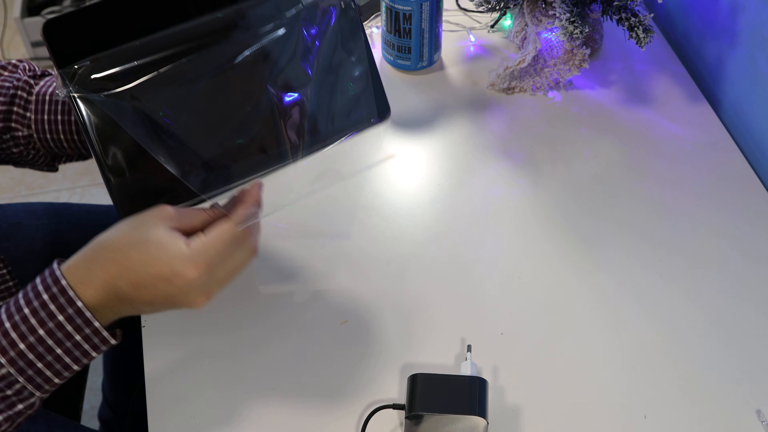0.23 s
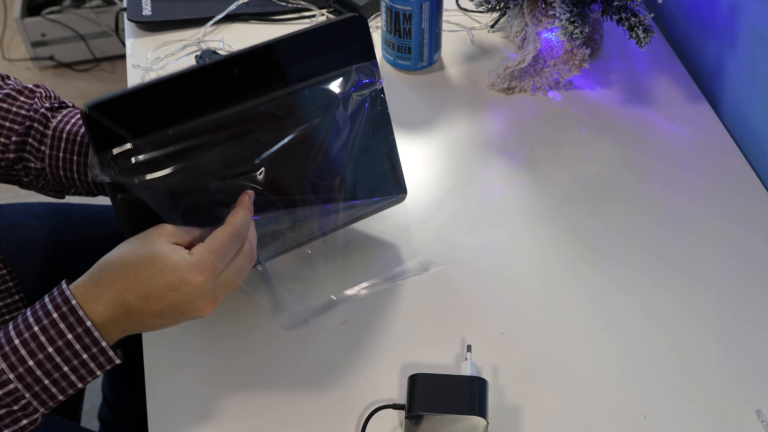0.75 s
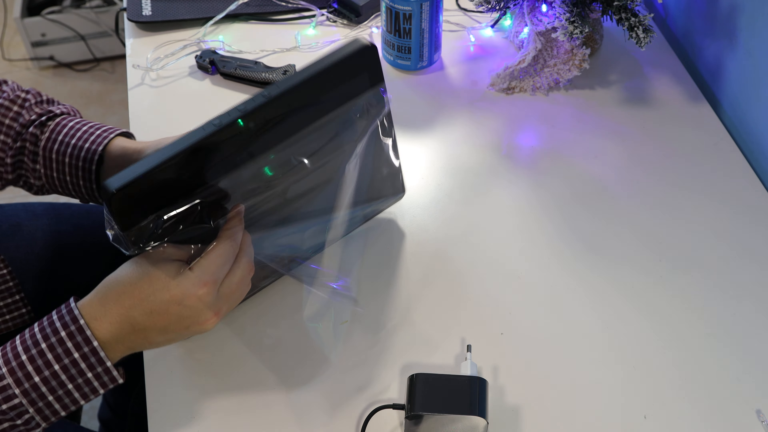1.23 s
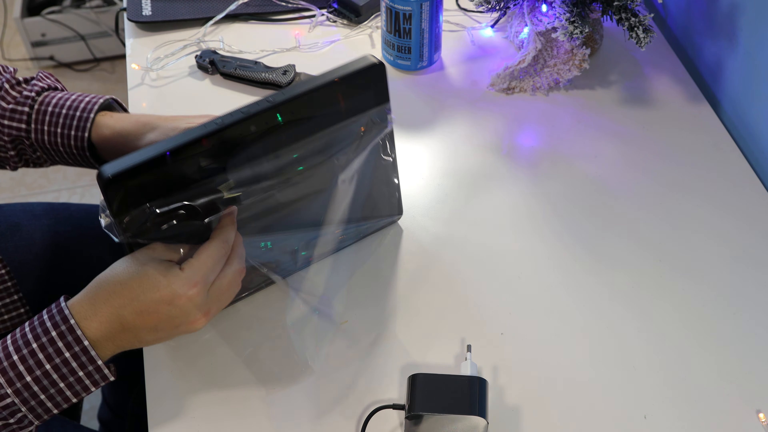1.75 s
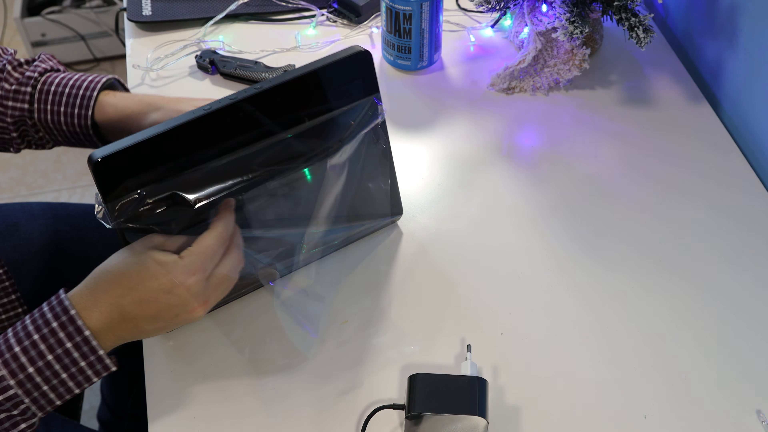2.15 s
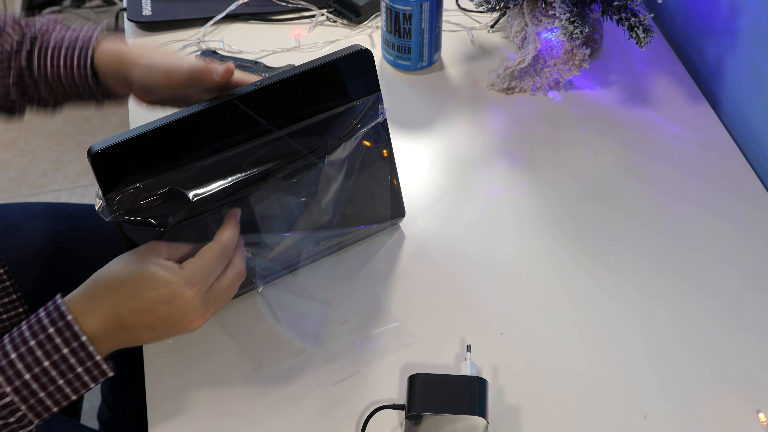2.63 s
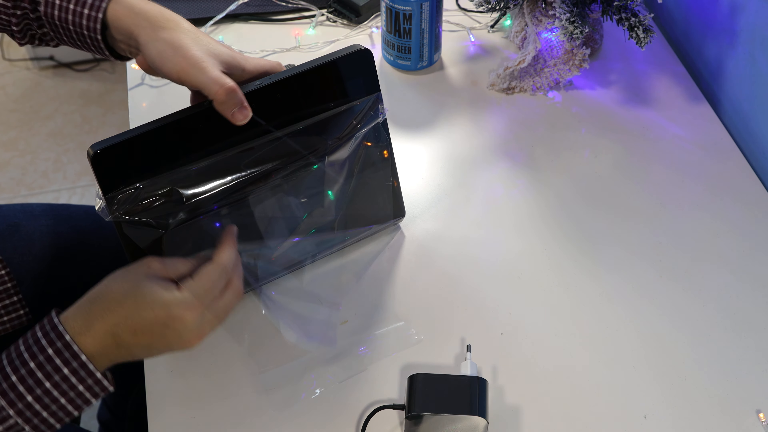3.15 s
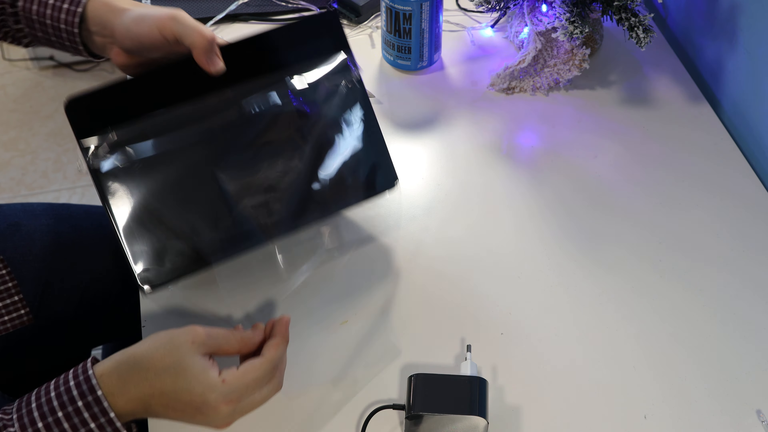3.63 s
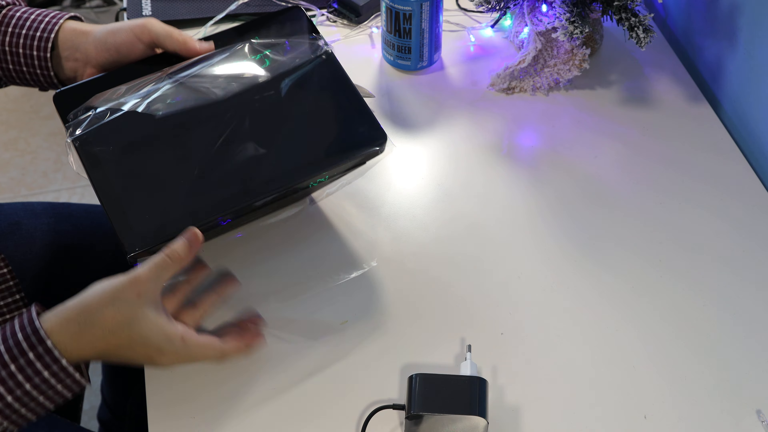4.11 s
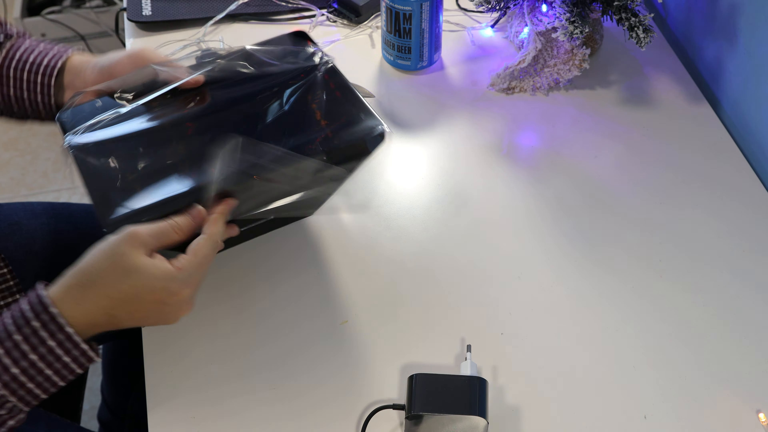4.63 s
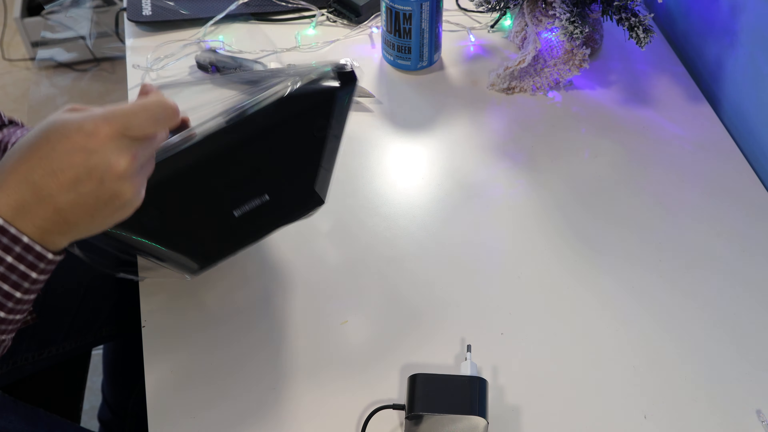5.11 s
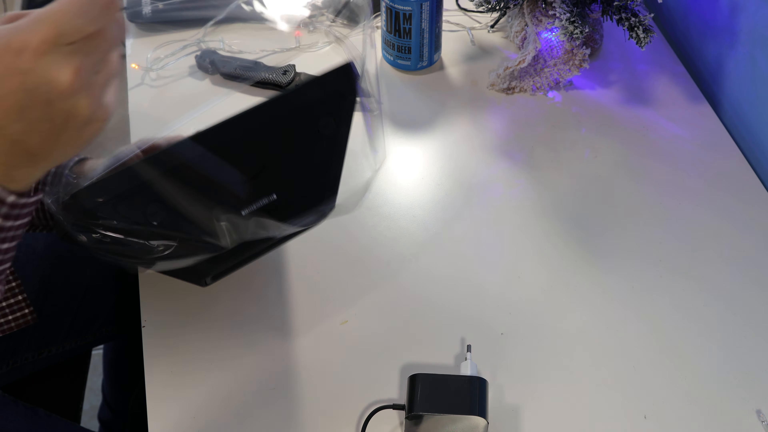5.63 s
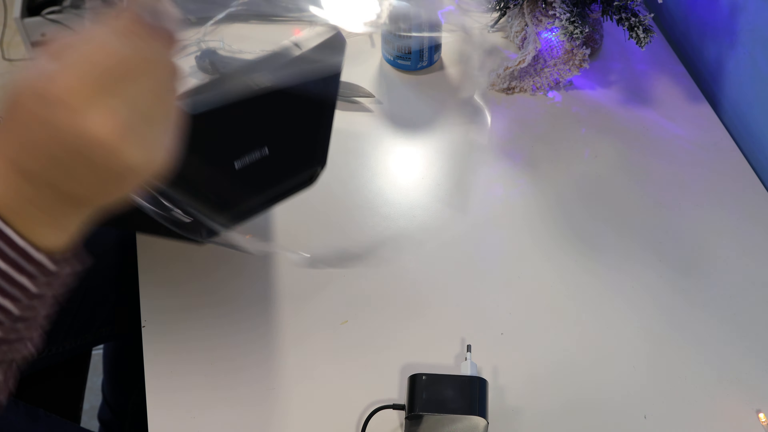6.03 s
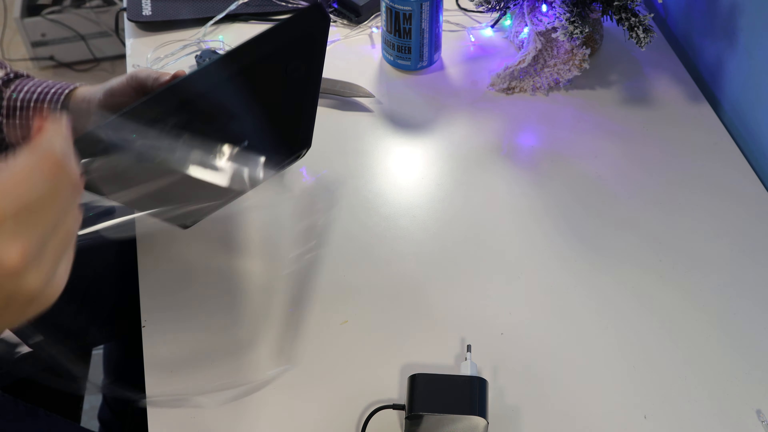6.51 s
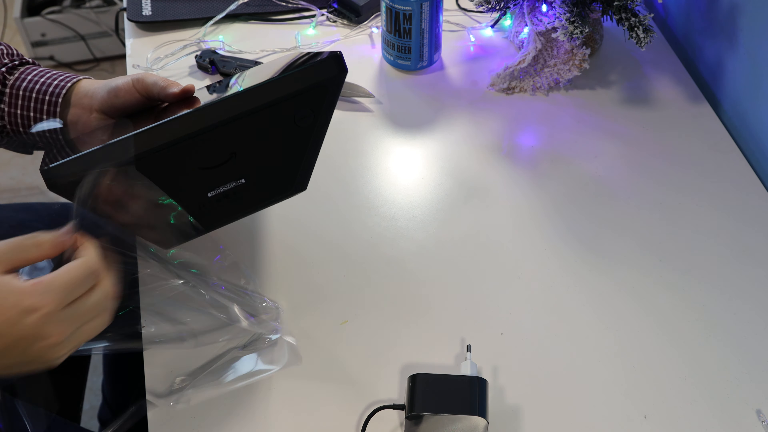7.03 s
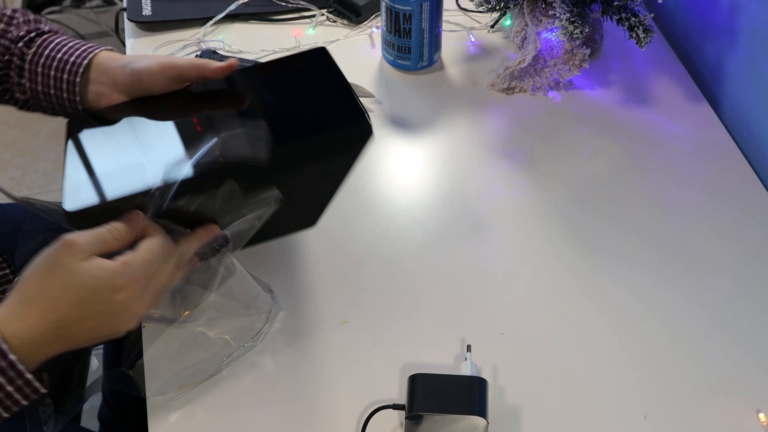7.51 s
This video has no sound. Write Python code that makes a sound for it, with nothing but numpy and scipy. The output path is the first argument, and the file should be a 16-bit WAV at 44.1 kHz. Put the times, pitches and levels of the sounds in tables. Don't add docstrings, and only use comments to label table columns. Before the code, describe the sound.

Thin plastic film rustles sharply and snaps as a flat screen is turned over a desk, its edge knocking the wood once hard and touching softly. Fingers then pick at the film with lighter, sparser crackles. The film pulls off in loud, bright snaps, briefly eases, then is crumpled in dense crinkles. Close stereo microphone, source slightly left, small hard room, faint hiss.

```python
import sys
import numpy as np
from scipy import signal
from scipy.fft import rfft, irfft
from scipy.io import wavfile
from scipy.ndimage import uniform_filter1d

SR = 44100
rng = np.random.default_rng(int(sys.argv[2]) if len(sys.argv) > 2 else 0)


def persist_wave(psi):
    counts = np.round(np.clip(psi, -1, 1) * 32767).astype(np.int16)
    wavfile.write(sys.argv[1], SR, np.atleast_2d(counts).T)


def volts(x):
    e = np.asarray(x, float) / 20
    return 10 ** e


N = 342216

# (greatest effort [s], rustle level [dB], swell [s], fade [s], tautness as treble level [dB])
TUGS = [(0.0, -23, .05, 0.094, -6.5), (0.15, -39, 0.014, 0.17, -2), (0.52, -46.5, 0.23, 0.58, -11),
        (0.89, -37.5, 0.064, 0.26, -22), (1.05, -36.5, 0.53, 0.29, -17), (1.48, -33, 0.17, 0.64, -8),
        (1.87, -42.5, 0.13, 0.33, -11), (2.029, -29, 0.2, 0.2, -6), (2.66, -39, .25, 0.24, -7),
        (2.94, -39, 0.12, 0.23, -14), (3.25, -40.5, 0.076, 0.24, -6), (3.38, -37, .1, .3, -10.5),
        (3.69, -36, 0.072, 0.64, -20), (4.12, -32.5, 0.031, 1, -7), (4.5, -33, .5, 0.9, -7.5),
        (4.88, -31, 0.035, 0.19, -40), (5.077, -22.5, 0.086, 0.27, -7.5), (5.575, -19, 0.17, 0.25, -5.5),
        (5.899, -32, 0.59, 0.24, -10), (6.55, -72, 0.18, 0.21, -24), (6.72, -32, 0.055, .3, -7.5),
        (6.969, -27.5, .12, .35, -9.5), (7.309, -23.5, 0.24, 0.17, -4), (7.644, -27.5, 0.23, .2, -7)]
SWING_DB, BEND = 30, 1.6
# (frequency [Hz], density [dB per Hz])
RUSTLE_SPECTRUM = [(88, -47.5), (150, -5), (439, -1.5), (624, -5.5), (821, 0), (1900, 0), (13700, -3),
                   (16000, -15)]
TICKS_PER_S, TICKS_PER_DB = 3500, 0.43
AFTER_DB, AFTER_S, AFTER_TAUT_DB = -25.5, 0.076, 13.5
# (frequency [Hz], density [dB per Hz])
AIR_SPECTRUM = [(18, -43), (30, -7.5), (250, 0.5), (792, -4.5), (953, -8), (2400, -4.5), (15200, -20),
                (16500, -32)]
AIR_DB = -62.5
# (time [s], peak [dB], wide-fold part [dB], sharp-edge part [dB], facet resonance [Hz])
SNAPS = [(0.142, -5.5, -29, -9.5, 1440), (0.234, -23.5, -7.5, -15, 2130),
         (0.349, -33, -17, -15.5, 2170), (0.432, -34, -12, -34, 1350), (0.45, -32.5, -2, -27, 1780),
         (0.484, -28, -6.5, -24, 2320), (0.564, -31.5, -6, -37, 2450), (0.664, -33.5, -14, -22, 2580),
         (0.782, -26, -22, -28, 1780), (0.803, -29, -8, -33, 1660), (0.881, -4.5, -18, -14.5, 1820),
         (1.002, -13.5, -19.5, -20.5, 2150), (1.036, -11.5, -15, -22.5, 3300),
         (1.104, -19, -20, -17.5, 3130), (1.396, -15, -12.5, -22, 3110), (1.487, -17.5, -4, -14, 1550),
         (1.614, -17.5, -28, -11, 2190), (1.731, -23, -23, -18.5, 3170),
         (1.864, -18.5, -19, -26, 1660), (1.969, -10.5, -18.5, -17.5, 3300),
         (2.023, -7, -15.5, -12, 2420), (2.11, -11.5, -36, -15, 3970), (2.254, -19, -37, -5.5, 2760),
         (2.388, -23, -16, -20, 3150),
         (2.584, -24, -15.5, -20, 4500), (2.631, -22, -30, -38, 3640), (2.697, -18.5, -19, -28, 2100),
              (2.886, -29, -12, -27, 1350), (2.936, -17.5, -7, -25.5, 2660), (3.232, -31, -14, -35, 4590),
              (3.317, -24.5, -25, -25, 1640), (3.354, -17, -14, -27, 1610), (3.378, -13.5, -14, -22, 1620),
              (3.562, -30.5, -16, -38, 1290), (3.677, -6.5, -17.5, -22, 1810),
              (3.75, -4.5, -17.5, -13.5, 1660), (3.87, -24.5, -11, -30, 1640),
              (3.913, -20.5, -12.5, -25, 1760), (3.923, -18.5, -21, -19, 3830),
              (4.098, -11, -15.5, -24, 2110), (4.16, -18, -14, -21, 1990), (4.21, -18.5, -37, -24.5, 1960),
              (4.293, -8.5, -20, -17.5, 2180), (4.364, -12.5, -21, -22.5, 1396),
              (4.391, -22, -29, -14, 2870), (4.493, -16.5, -10, -21, 2160), (4.54, -8, -33, -12, 2260),
              (4.598, -20, -34, -20, 2200),
         (4.65, -15, -15, -24, 2000), (4.768, -24.5, -23, -27, 2587), (4.848, -1, -19.5, -18.5, 3900),
              (4.924, -2.5, -18, -11.5, 1950), (4.972, -17, -35, -12, 1640), (4.992, -10.5, -19, -12, 3510),
              (5.001, -9, -32, -25, 3980), (5.025, -6.5, -22, -15.5, 1940), (5.056, -13, -25, -9, 2820),
              (5.068, 3, -15.5, -12, 2260), (5.198, -17.5, -18, -31, 2660), (5.304, -22.5, -48, -18, 2143),
              (5.375, -20.5, -16, -28, 2240), (5.465, -21, -14, -22, 1830), (5.516, -10, -39, -10.5, 3920),
              (5.647, -4, -29, -13.5, 1990), (5.662, -8, -22, -34, 1890), (5.682, -25, -19, -25, 2050),
              (5.695, -6.5, -23.5, -18, 3980), (5.827, -21, -5, -16, 2640),
              (5.929, -12.5, -30, -14.5, 3400), (6.049, -18.5, -24, -15, 3530),
         (6.483, -30.5, -13, -37, 2330), (6.545, -35.5, -9, -43, 1690), (6.68, -12, -21, -23, 2280),
                 (6.719, -7, -17, -22.5, 1870), (6.753, -11.5, -27, -33, 2820),
                 (6.83, -25.5, -15, -22, 1450), (6.909, -18.5, -23, -18, 1730),
                 (6.945, -9.5, -28, -11.5, 3300), (6.983, -8.5, -29, -11, 3200),
                 (7.106, -15, -21, -24, 2600), (7.188, -21, -8, -31, 2760), (7.212, -15, -13, -23, 2030),
                 (7.231, -20, -31, -30.5, 2120), (7.268, -19, -15, -22, 1850), (7.281, -12, -13, -19, 2140),
                 (7.311, -6.5, -23, -15, 2330), (7.354, -12, -24, -6, 2420), (7.42, -24, -17, -21, 1280),
                 (7.461, -17, -18, -15.5, 1640), (7.486, -17, -21, -32, 1810),
                 (7.522, -6.5, -22, -14, 4250), (7.559, -12.5, -18, -17, 1640),
                 (7.602, -22, -31, -18, 2370), (7.636, -3.5, -43, -18, 2160)]
PAN_DB, PAN_SPREAD_DB = -1.4, 3
# (time [s], peak [dB], hardness [dB per octave], rocking after the blow [s])
KNOCKS = [
    (1.259, -24, -11.5, 0.06),
    (1.467, -6, -1, 0.058),
    (2.069, -23.5, -17, 0.055),
    (2.339, -25.5, -17.5, 0.076),
    (4.052, -30, -8, 0.16),
    (4.125, -33, 5, 0.053),
    (5.071, -28, -1, 0.08),
    (6.665, -37.5, -1, 0.13),
]
# (frequency [Hz], level [dB], t60 [s])
DESK_MODES = [(64.8, -22, 0.45), (116.5, -5, 0.076), (177, -7.5, 0.33), (203, -5.5, 0.14), (256, 4, 0.15),
              (304, -16, 0.8), (357, 2, 0.056), (440, -3, 0.29), (504, -10.5, 0.51), (651, -12.5, 0.2),
              (790, -14, 0.099), (994, -11.5, 0.085)]
# (delay [s], level [dB])
ECHOES = [
    (.0014, -19.5),
    (.0062, -13),
    (0.0089, -8.5),
]
# (frequency [Hz], t60 [s])
ROOM_DECAY = [(250, 0.53), (700, 0.43), (1800, 0.32), (4600, 0.35), (12000, 0.19)]
# (frequency [Hz], left-right likeness [0-1])
LIKENESS = [(60, 0.93), (300, 0.87), (700, 0.9), (1500, 0.41), (3000, 0.0166), (15000, .01)]


def evened(x):
    return x / np.sqrt(np.mean(x ** 2) + 1e-20)


def read(points, hz):
    f, value = np.transpose(points)
    return np.interp(np.log(hz + 1), np.log(f + 1), value)


def add(mix, s, sound):
    part = mix[..., max(round(s * SR), 0):][..., :sound.shape[-1]]
    part += sound[..., :part.shape[-1]]


def band(x, lo_hz, hi_hz):
    return signal.sosfilt(signal.butter(2, [lo_hz, hi_hz], "band", fs=SR, output="sos"), x)


def causal(db):
    log = np.log(volts(np.r_[db, db[-2:0:-1]]))
    return np.exp(np.conj(signal.hilbert(log)))[:len(db)]


def bump(hz, centre_hz, width):
    return np.exp(-(np.log((hz + 1) / centre_hz) / width) ** 2)


def ports(x, pan_db=0):
    gain = volts(np.array([[pan_db / 2], [-pan_db / 2]]))
    return gain * np.array([x, np.roll(x, 2)])


def diffuse(pair):
    a, b = rfft(pair)
    same = read(LIKENESS, np.fft.rfftfreq(pair.shape[1], 1 / SR))
    like, unlike = np.sqrt((1 + same) / 2), np.sqrt((1 - same) / 2)
    return irfft(np.array([like * a + unlike * b, like * a - unlike * b]), pair.shape[1])


def creases():
    return SNAPS


def hand():
    flurries = [(s + 0.0023, db + AFTER_DB, .016, AFTER_S, edge_db + AFTER_TAUT_DB)
                for s, db, _, edge_db, _ in creases()]
    s, db, swell_s, fade_s, taut_db = np.transpose(TUGS + flurries)[:, :, None]
    t = np.arange(0, N, 32) / SR
    away = np.maximum((s - t) / swell_s, (t - s) / fade_s)
    power = volts(2 * (db - SWING_DB * away ** BEND)) + 1e-12
    total = power.sum(0)
    both = 10 * np.log10(total), (power * taut_db).sum(0) / total
    return [np.interp(np.arange(N) / SR, t, curve) for curve in both]


def rustle():
    level_db, taut_db = hand()
    clump = evened(uniform_filter1d(uniform_filter1d(rng.standard_normal(N), size=400), size=300))
    chance = rng.random(N)
    size = np.minimum(rng.exponential(1, N), 5)
    sign, place = rng.standard_normal((2, N))
    fires = chance < TICKS_PER_S * volts(TICKS_PER_DB * (level_db + 35)) / SR
    ticks = fires * volts(3.77 * size + 5.1 * clump) * np.sign(sign)
    ticks /= np.sqrt(uniform_filter1d(ticks ** 2, size=1800) + 1e-6)
    spread = ports(np.ones(N), 0.29) * volts(4.96 * place * np.array([[1], [-1]]))
    facet = rng.integers(0, 8, N)
    hz = np.fft.rfftfreq(1024, 1 / SR)
    pair = 0
    for k, facet_hz in enumerate(np.geomspace(500, 14000, num=8)):
        ring_db = read(RUSTLE_SPECTRUM, hz) + 14 * bump(hz, facet_hz, .35)
        ring = irfft(causal(ring_db))
        pair = pair + signal.oaconvolve(spread * ticks * (facet == k), ring[None])[:, :N]
    pair[1] = np.roll(pair[1], 2)
    hz = np.fft.rfftfreq(N, 1 / SR)
    low = irfft(rfft(pair) / (1 + (hz / 4500) ** 4), N)
    treble = pair - low
    return volts(level_db - 6) * (low + volts(taut_db) * treble) / np.std(low)


def handling(film):
    effort = np.sqrt(abs(uniform_filter1d(film[0] ** 2, size=6000)))
    rumble = evened(band(rng.standard_normal(N), 103, 630))
    return ports(volts(-18) * effort * rumble)


def air():
    z = rfft(diffuse(rng.standard_normal((2, N))))
    colour = volts(read(AIR_SPECTRUM, np.fft.rfftfreq(N, 1 / SR)))
    return volts(AIR_DB + 9.0) * evened(irfft(z * colour, N))


def snaps():
    out = np.zeros((2, N))
    t, hz = np.arange(512) / SR, np.fft.rfftfreq(512, 1 / SR)
    rows = creases()
    draws = rng.standard_normal((len(rows), 4, 512))
    for (s, db, fold_db, edge_db, facet_hz), (front, back, jerk, luck) in zip(rows, draws):
        flip = np.exp(.8 * jerk - (t / .0028) ** 2) * np.minimum(t / .0004, 1)
        z = rfft(np.array([front, 0.4 * np.roll(front, 2) + 0.37 * back]) * flip)
        z /= uniform_filter1d(abs(z) ** 2, size=5, axis=1) ** .5
        colour = [(150, fold_db - 21.5), (600, fold_db + 9.0), (1100, fold_db + 10.5), (1800, -7.5),
                  (5000, -9.0), (8000, edge_db + 5), (16000, edge_db - 3.0)]
        facet_db = 6.5 * bump(hz, facet_hz, 0.4)
        snap = irfft(z * causal(read(colour, hz) + facet_db)) * np.exp(-(t / .005) ** 2)
        pan_db = np.clip(PAN_DB + PAN_SPREAD_DB * luck[1], -12, 12)
        gain = volts(db + 2.0 + pan_db * np.array([[.5], [-.5]]))
        add(out, s, gain * snap / abs(snap.mean(0)).max())
    return band(out, 250, 20000)


def knocks():
    out, t = np.zeros(N), np.arange(SR) / SR
    draws = rng.standard_normal((len(KNOCKS), len(DESK_MODES) + 8000))
    for (s, db, hard_db, rock_s), draw in zip(KNOCKS, draws):
        spot_db = 1.5 * draw
        ring = 0
        for (hz, mode_db, t60_s), g_db in zip(DESK_MODES, spot_db):
            level_db = mode_db + hard_db * np.log2(max(hz, 110) / 250) + g_db
            ring = ring + volts(level_db - 60 * t / t60_s) * np.cos(2 * np.pi * hz * t)
        push = 0.0079 * draw[len(DESK_MODES):] ** 3 * np.exp(-(t[:8000] / rock_s) ** 4)
        push[:1] += volts(0.7 * min(hard_db, 0))
        knock = band(signal.fftconvolve(ring, push), 55, 970)
        add(out, s, volts(db + 4.5) * knock / abs(knock).max())
    return ports(out)


def tail():
    taps = np.zeros((2, SR // 2))
    slots = np.arange(220, SR // 2 - 8, 8)
    at = slots + rng.integers(0, 8, (2, len(slots)))
    np.put_along_axis(taps, at, rng.choice([-1., 1.], at.shape), 1)
    hz, t, z = signal.stft(diffuse(taps), SR, nperseg=256)
    decay = volts(-60 * t / read(ROOM_DECAY, hz)[:, None])
    out = signal.istft(z * decay, SR, nperseg=256)[1]
    return out / np.linalg.norm(out[0])


def room(x):
    out = x.copy()
    for s, db in ECHOES:
        add(out, s, volts(db) * x)
    turn = 2 * np.pi * 7 * np.arange(N) / SR
    for k in range(3):
        share = np.sqrt(2 / 3) * np.cos(turn + k * np.pi / 3)
        wet = signal.fftconvolve((share * x[k % 2])[None], tail(), axes=1)[:, :N]
        out += volts([[-4.5], [-3.6]]) * wet
    return out


def scene():
    film = rustle()
    desk = knocks() + handling(film)
    return room(snaps() + film + .4 * desk) + .8 * desk + air()


def top_cut(x):
    return signal.sosfilt(signal.butter(12, 16980, fs=SR, output="sos"), x)


def record(dry):
    heard = np.clip(dry, -.9, .9)
    bass = signal.butter(1, 150, fs=SR, output="sos")
    side = signal.sosfilt(bass, (heard[0] - heard[1]) / 2)
    heard = heard - side * np.array([[1], [-1]])
    heard = signal.sosfilt(signal.butter(3, 55, "high", fs=SR, output="sos"), heard)
    lowpass = signal.firwin(255, 16300, window=("kaiser", 9), fs=SR)
    heard = signal.oaconvolve(heard, lowpass[None], "same")
    return top_cut(heard)


dry = scene()
out = record(dry)
persist_wave(out)
```